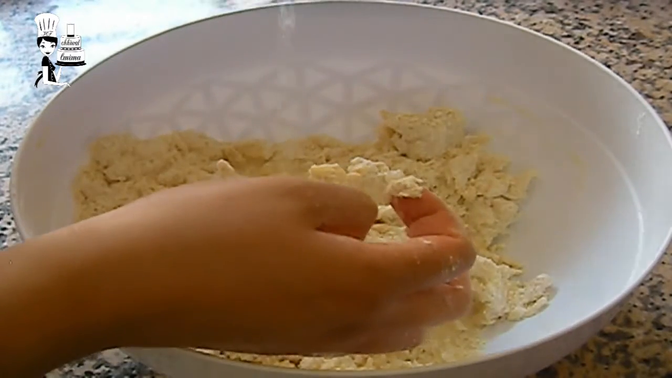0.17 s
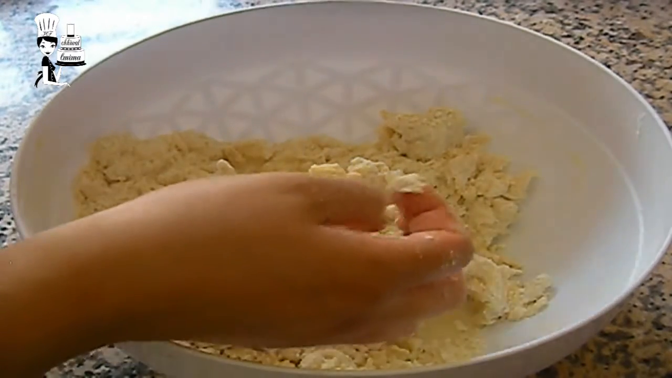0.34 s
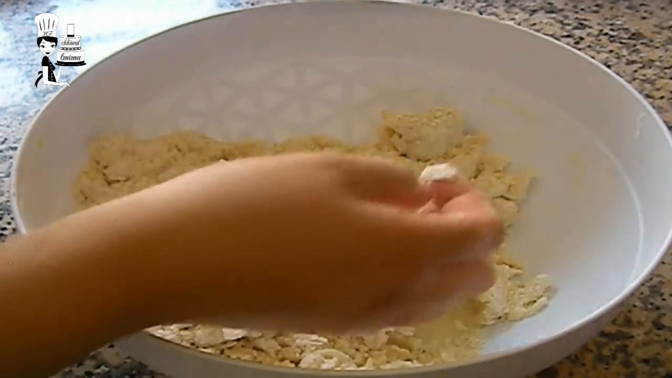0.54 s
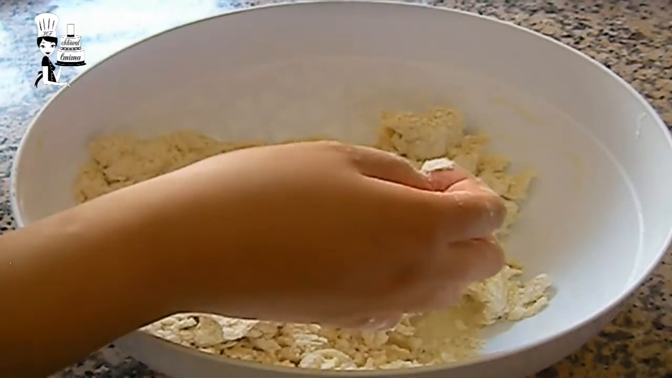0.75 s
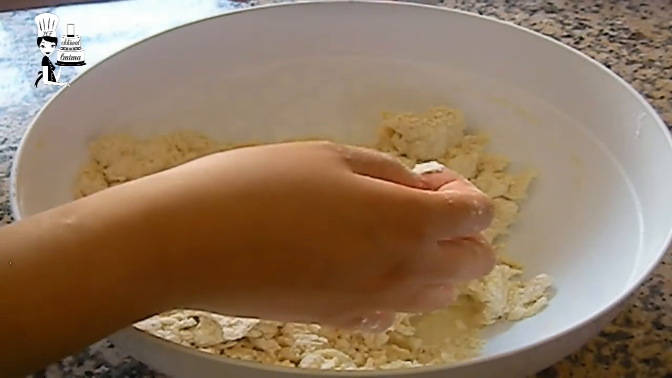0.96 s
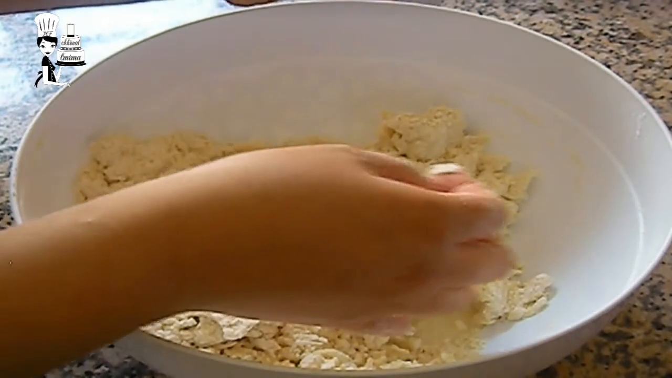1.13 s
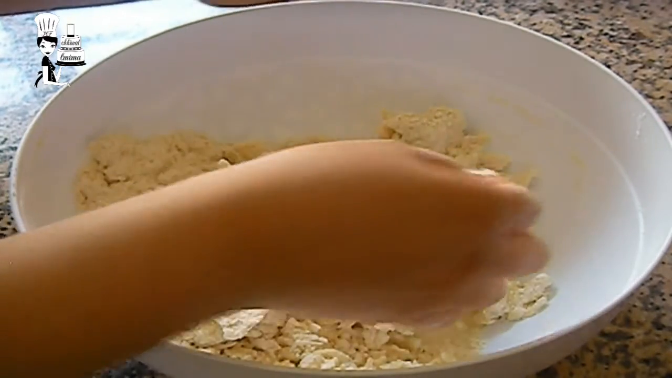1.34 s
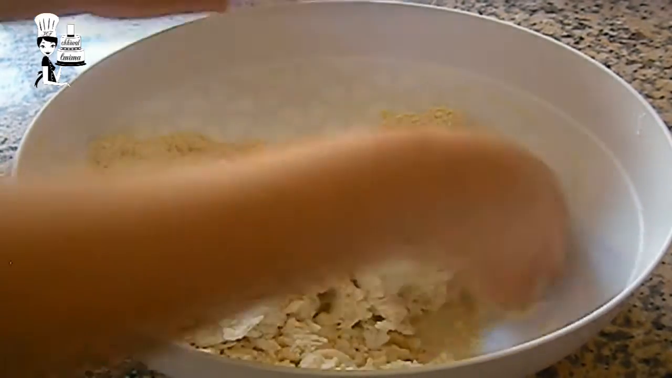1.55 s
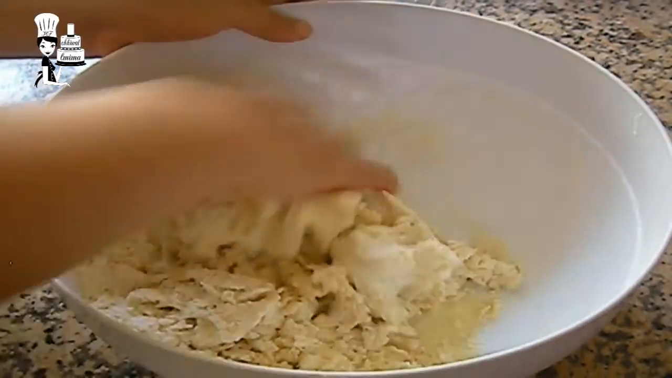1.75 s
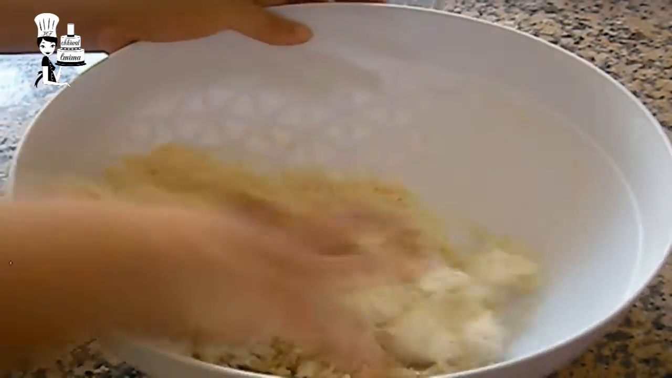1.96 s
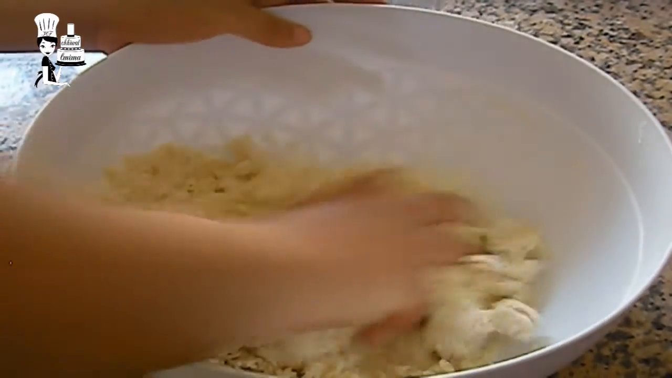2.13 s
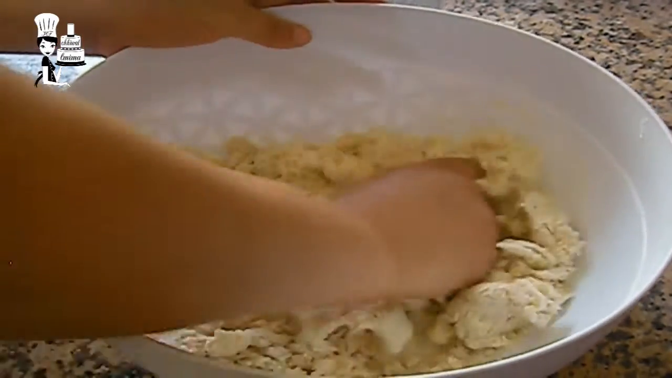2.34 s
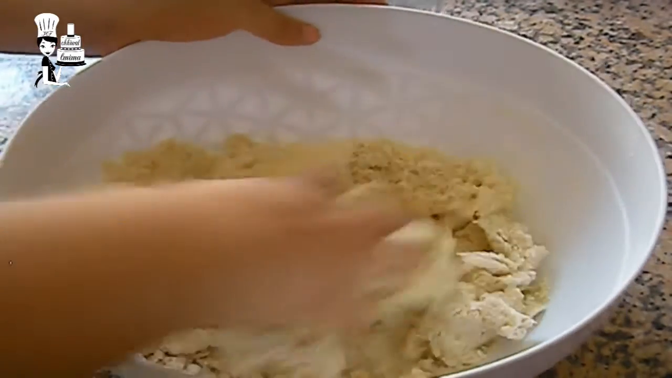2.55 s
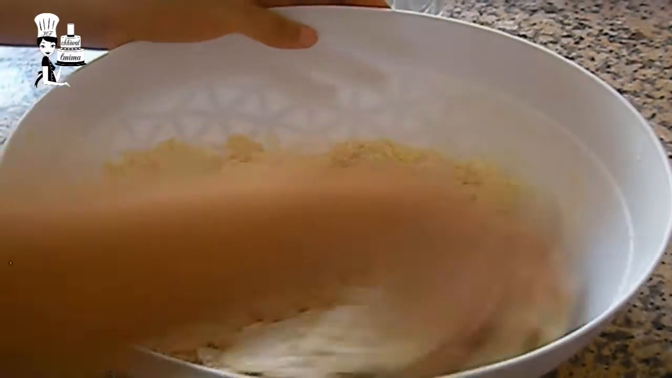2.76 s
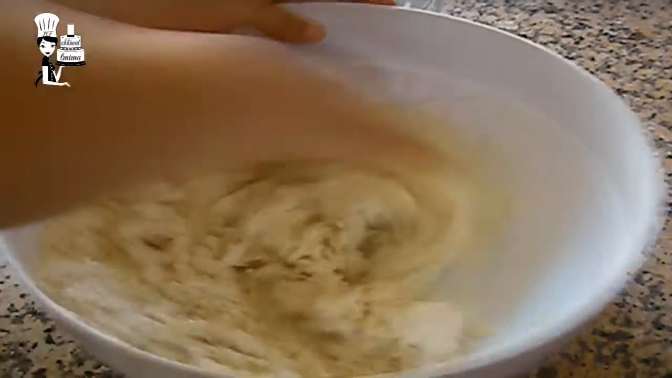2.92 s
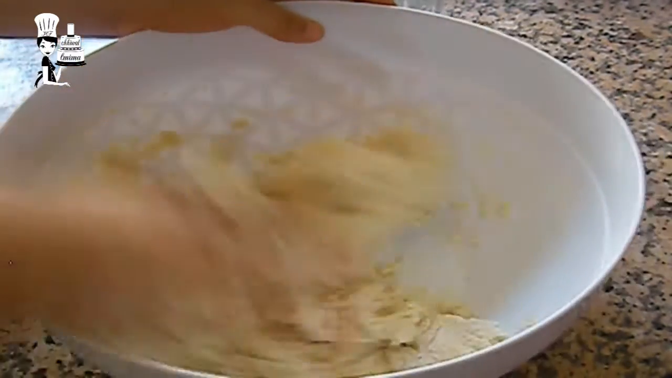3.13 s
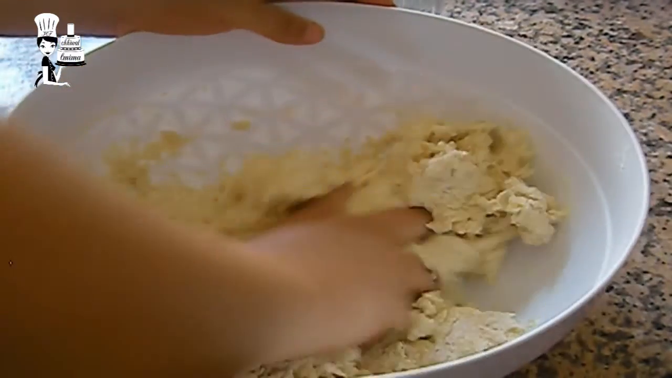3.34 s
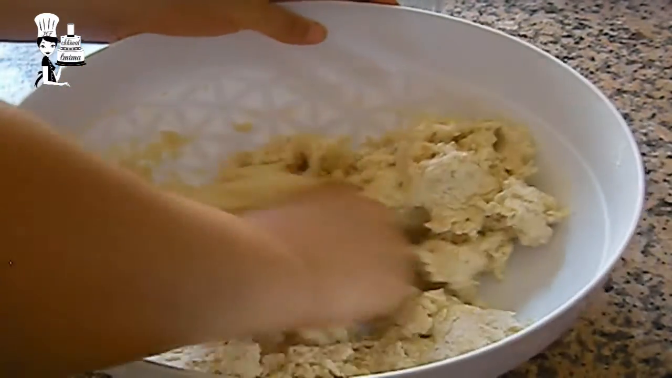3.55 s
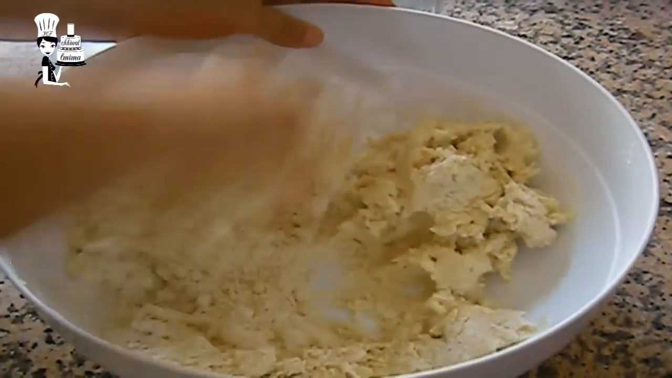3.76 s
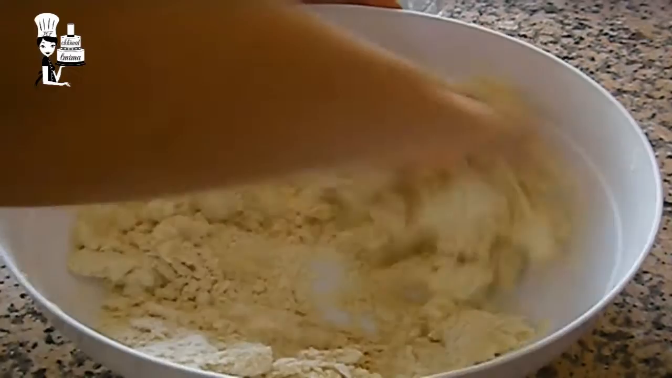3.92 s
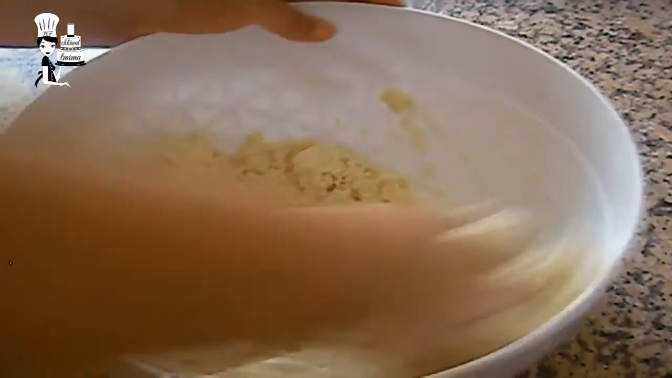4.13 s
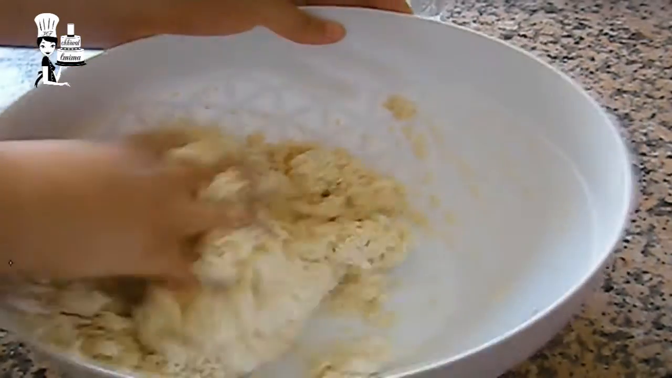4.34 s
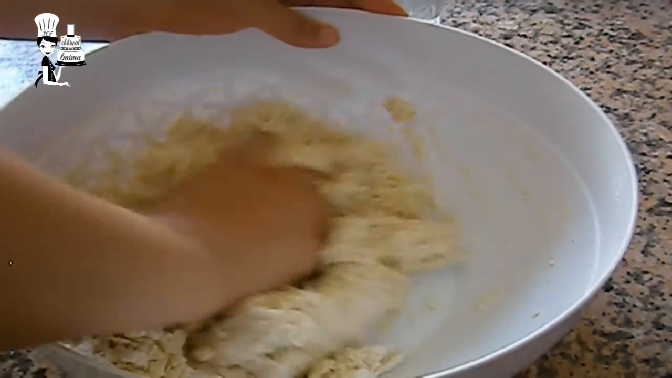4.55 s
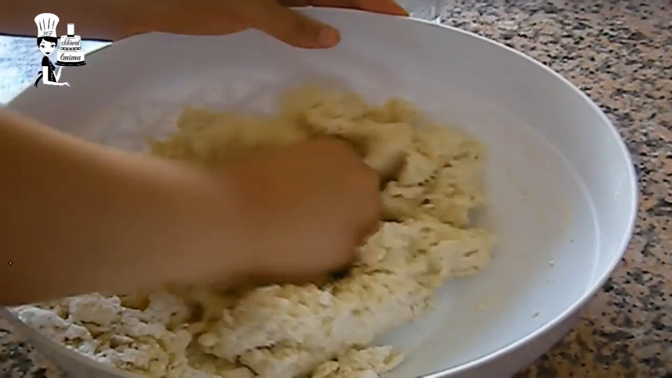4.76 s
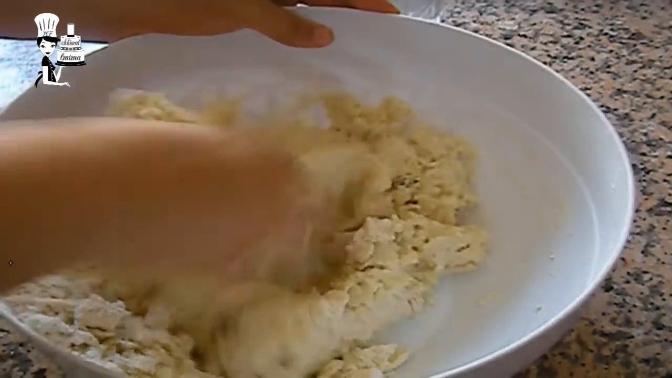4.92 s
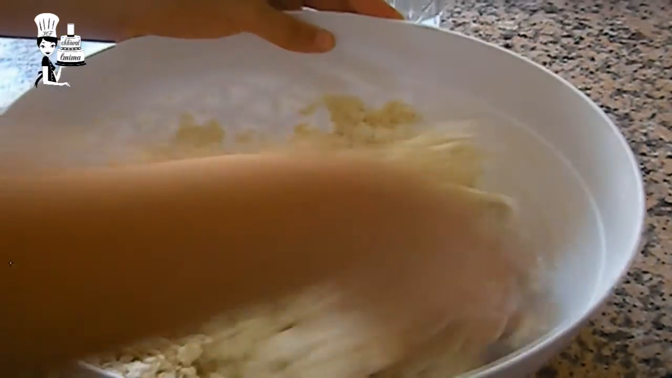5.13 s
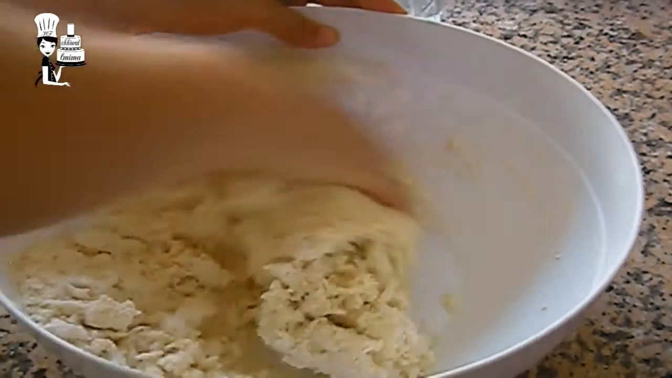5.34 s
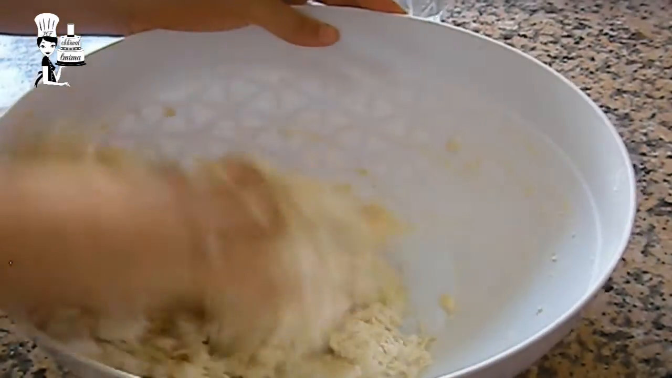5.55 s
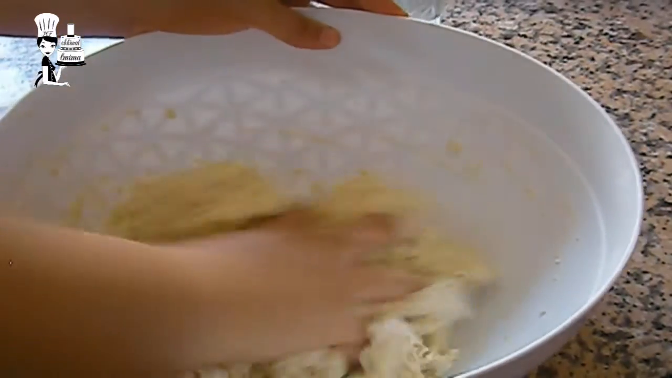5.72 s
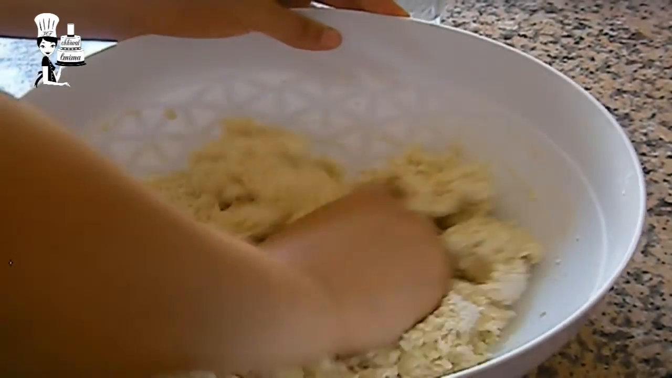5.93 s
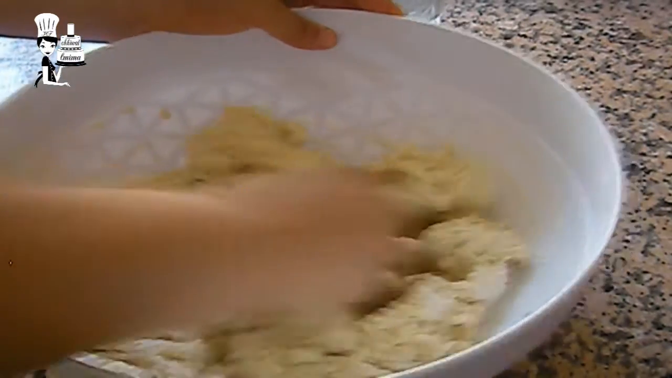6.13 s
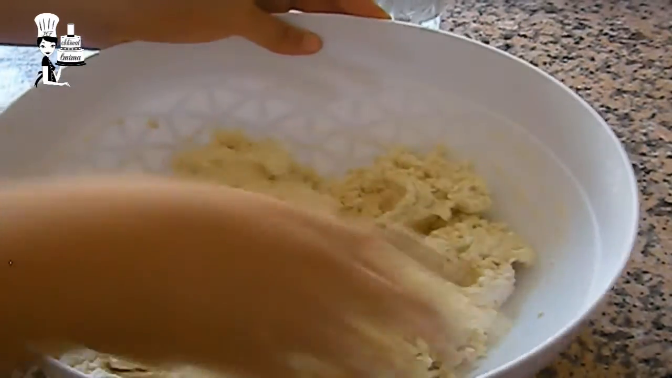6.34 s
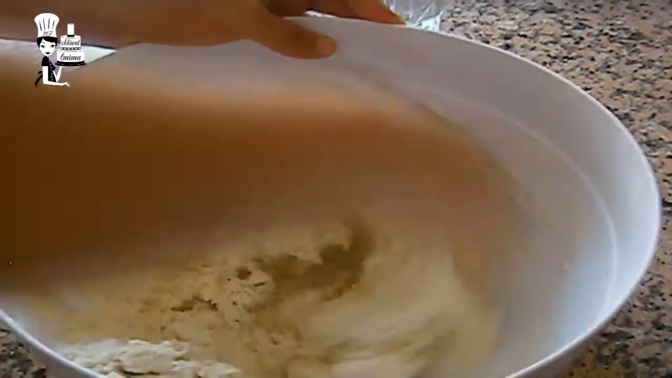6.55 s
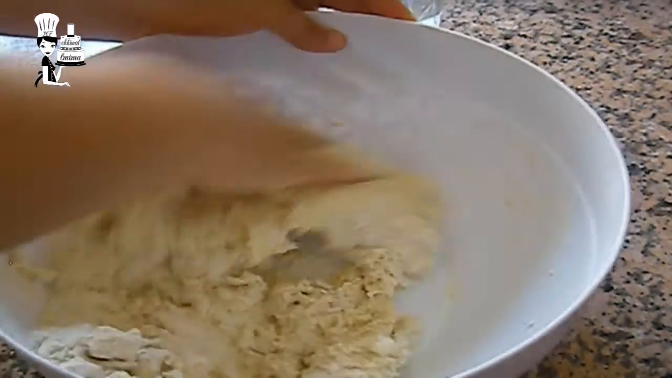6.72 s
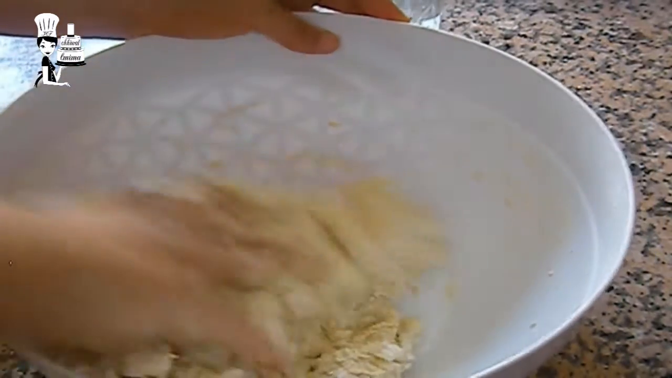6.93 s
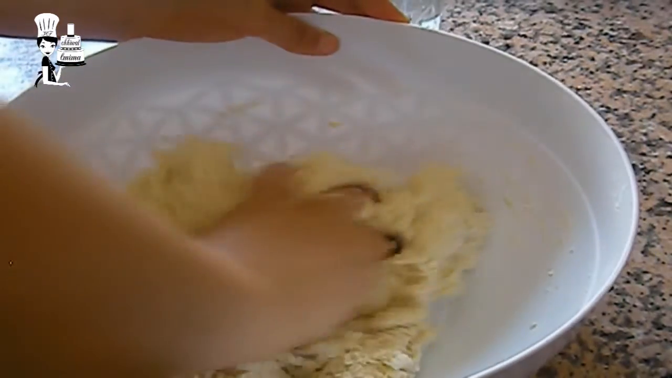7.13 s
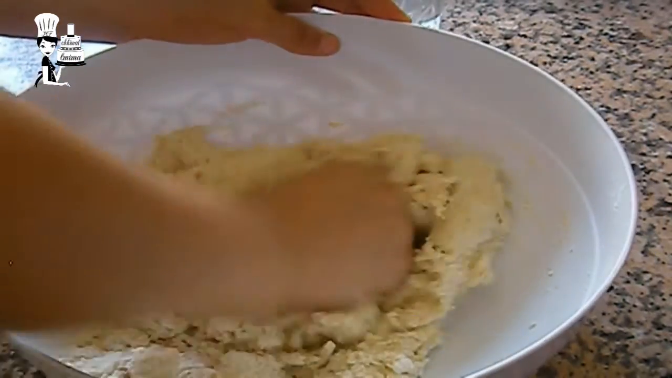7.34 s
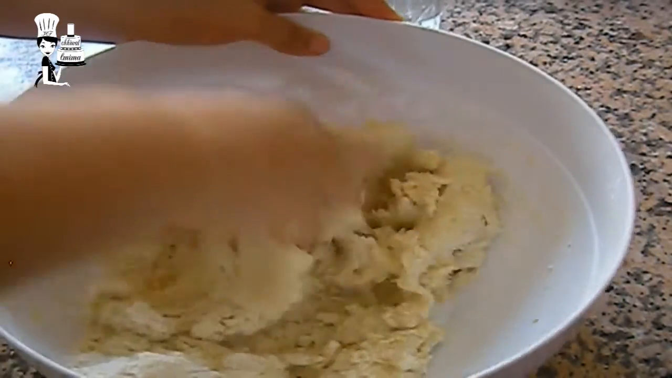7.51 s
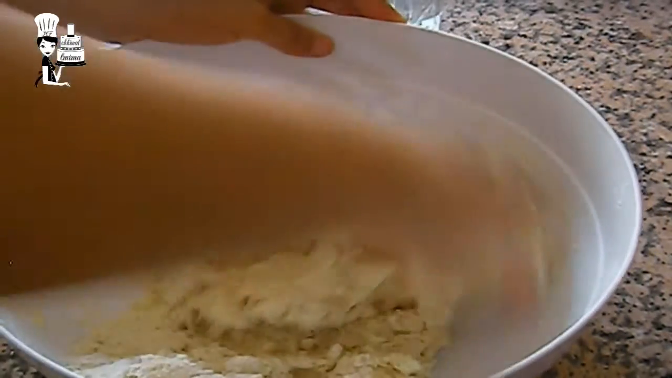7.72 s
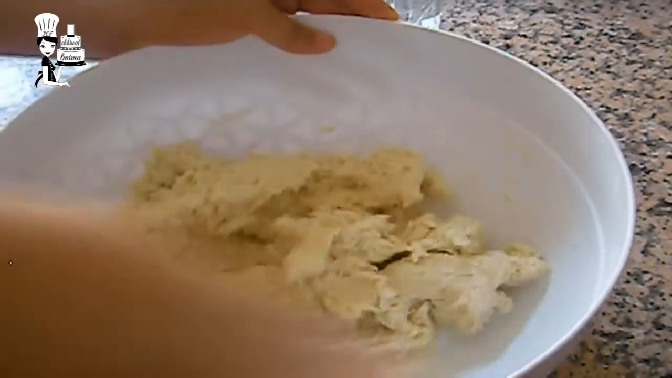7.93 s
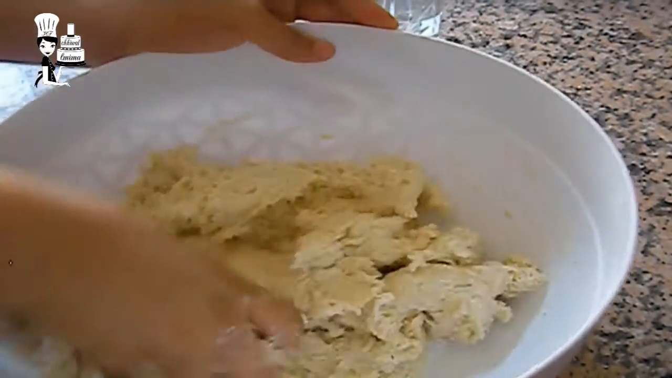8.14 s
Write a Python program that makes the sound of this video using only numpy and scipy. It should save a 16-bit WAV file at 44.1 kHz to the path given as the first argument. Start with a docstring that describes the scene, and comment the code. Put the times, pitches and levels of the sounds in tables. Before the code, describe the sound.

Soft scraping of dough being mixed by hand, a glass set down on stone, and a plastic bowl knocking over a low drone.

```python
"""In a small hard kitchen, over a low drone, a hand stirs crumbly dough in a plastic bowl: crumbs drag on
the wall, sticky dough snaps as it parts. At 1.3 and 1.6 s a glass is set down on the stone counter and
rings. Then the hand squeezes harder and the bowl rocks and knocks on the stone. Around 5 s its wall groans
under the hand; its hardest knock lands at 6.5 s, and the kneading goes on to the end.
A dull microphone hears it all and overloads on the loudest blows."""
import sys
import numpy as np
from scipy import signal
from scipy.fft import rfft, irfft
from scipy.io import wavfile
from scipy.ndimage import uniform_filter1d

SR = 44100
rng = np.random.default_rng(int(sys.argv[2]) if len(sys.argv) > 2 else 0)


def waveform_to_disk(signal):
    """Save audio, clipped to [-1, 1], as 16-bit WAV at the path in sys.argv[1]."""
    frames = np.transpose(np.atleast_2d(signal))
    scaled = np.clip(frames, -1, 1) * 32767
    samples = np.round(scaled).astype(np.int16)
    wavfile.write(sys.argv[1], SR, samples)


N = 360621

# sticky dough letting go: (time [s], peak [dB], cavity pitch [Hz], cavity gain [dB])
DOUGH_SNAPS = [(0.084, -28.5, 2390, 7), (0.306, -23.5, 4000, 23), (0.3168, -29, 2460, 23),
               (0.41, -19, 2200, 16.5), (0.445, -21.5, 2460, 4), (0.5372, -26.5, 2270, -1),
               (1.82, -18, 2790, 5), (1.8565, -21, 2830, 17), (2.4032, -15, 2110, 16),
               (3.1012, -18, 2300, 13), (3.5915, -21, 2640, 14), (3.7394, -14.5, 2350, 13.5),
               (3.944, -14, 2670, 2), (4.058, -20, 1860, 13), (4.122, -28, 2200, 19),
               (4.136, -17, 2200, 21.5), (4.159, -17.5, 2150, 29.5), (4.165, -34, 2400, 12),
               (4.684, -13, 2300, 5), (4.752, -20.5, 2450, 3), (4.765, -29, 3500, 2),
               (4.834, -20.5, 2550, -9), (5.206, -19, 2200, 16), (5.3252, -21.5, 3300, -2),
               (5.382, -24, 2040, 6), (5.472, -19.5, 2730, 11), (6.131, -15.5, 2150, -6),
               (6.18, -25, 3700, 17), (6.387, -14, 2360, 5), (6.48, -27, 2920, 13), (6.527, -36, 1800, 10),
               (6.651, -22, 2040, 18), (6.665, -17, 1814, 21), (6.6938, -15.5, 1880, 28),
               (6.8593, -28, 2510, 15), (7.438, -19, 2480, 11), (7.504, -28, 3180, 3),
               (7.6894, -16.5, 2300, -2), (7.7536, -15.5, 2900, 5), (7.9477, -28, 1940, 22),
               (7.9846, -18.5, 1700, 11), (8.0046, -20.5, 2290, 13.5)]
# the bowl rocks onto the stone: (time [s], ring peak [dB], crack above ring [dB], ring length [x t60])
BOWL_KNOCKS = [(1.871, -19, 6.5, 0.58), (2.312, -20.5, -1, 0.64), (2.979, -5.5, -2.5, 0.37),
               (2.995, -37, -11, 0.83), (3.024, -15.5, -1, 0.29), (3.121, -9.5, -3, 0.23),
               (3.54, -26, -2, 0.5), (3.591, -24.5, 12, 0.32), (3.739, -21, -10, 0.72),
               (4.102, -8.5, 0, 0.46), (4.124, -14, -8, 0.57), (4.135, -26, -5, 0.29),
               (4.159, -32, -12, 0.57), (4.223, -19, 3.5, 0.34), (4.327, -16, -8, 0.74),
               (4.752, -18.5, -16, 0.47), (5.205, -23.5, -2, 0.54), (5.425, -16, -2, 0.49),
               (5.496, -9.5, 2, 0.61), (5.866, -13, -2, 0.19), (6.097, -16.5, -8, 0.88),
               (6.4971, 3.5, -5.5, 0.57), (6.509, -10, -22, 0.95), (6.516, -9, -22, 0.55),
               (6.543, -16, -17, 1), (6.563, -12, -25, 1), (6.572, -13, -21, .8), (6.652, -15, -3.5, 0.59),
               (7.689, -19.5, -7, 0.31), (7.946, -21, 0, 0.48), (8.005, -24, -3, 0.87),
               (8.149, -17, -11, 0.68)]
# the glass meets the stone: (time [s], crack [dB], hardness [dB/octave], ring [dB], rattle t60 [s])
GLASS_HITS = [(1.332, 17, 2.5, -22, 0.027), (1.345, 3, 2, -34.5, .02), (1.565, -8, -4, -43, 0.02),
              (1.5686, 12, 0.5, -25, 0.014), (1.580, 2.5, 2, -49.5, 0.011), (1.591, 4.5, 1, -35, .012),
              (1.606, 1.5, -0.5, -32.5, 0.015)]


def gain_of(db):
    """Decibels to amplitude."""
    return 10 ** (np.asarray(db) / 20)


def unit_rms(x):
    """Scales to rms 1."""
    return x / np.sqrt(np.mean(x ** 2) + 1e-20)


def with_peak(x, db):
    """Scales to a peak level."""
    return gain_of(db) * x / abs(x).max()


def curve_at(points, hz):
    """Reads a curve over log frequency."""
    f, value = np.transpose(points)
    return np.interp(np.log(hz + 1), np.log(f + 1), value)


def add(mix, s, sound):
    """Mixes a sound in at s seconds."""
    part = mix[round(s * SR):][:len(sound)]
    part += sound[:len(part)]


def drift(samples):
    """Slow random motion of rms 1, smoothed over so many samples."""
    return unit_rms(uniform_filter1d(uniform_filter1d(rng.standard_normal(N), samples), samples))


def eq_impulse(points, tilt_db=0., size=4096):
    """Minimum-phase response of an EQ curve, tilted by tilt_db per octave about 1 kHz."""
    hz = abs(np.fft.fftfreq(size, 1 / SR))
    db = curve_at(points, hz) + tilt_db * np.log2(np.clip(hz, 100, 6000) / 1000)
    log_gain = np.log(gain_of(np.maximum(db, -120)))
    return np.fft.ifft(np.exp(log_gain - 1j * signal.hilbert(log_gain).imag)).real[:size // 2]


def moving_eq(x, db):
    """Shapes the short-time spectrum by db(Hz, s)."""
    hz, t, z = signal.stft(x, SR, nperseg=1024, noverlap=768)
    return signal.istft(z * gain_of(db(hz[:, None], t)), SR, nperseg=1024, noverlap=768)[1][:len(x)]


def resonate(x, hz, width, stages=2):
    """A resonance that can glide: each stage shifts hz down to zero, smooths, and shifts back."""
    carrier = np.exp(2j * np.pi * np.cumsum(hz * np.ones(len(x))) / SR)
    pole = np.exp(-np.pi * width / SR)
    for _ in range(stages):
        x = 2 * (carrier * signal.lfilter([1 - pole], [1, -pole], x / carrier + 1e-18)).real
    return x


def burst(t60, size=1500):
    """A click scattered by chained all-pass echoes: a rough dying burst with a flat spectrum."""
    x = signal.unit_impulse(size)
    for share in rng.uniform(.5, 1, 5) * np.geomspace(.12, .01, 5):
        delay = max(round(share * t60 * SR), 1)
        echo = np.append(signal.unit_impulse(delay), -.55)
        x = signal.lfilter(echo[::-1], echo, x)
    return x


def envelope(t, start, level_db, fade_db_per_s, swell=0., hold=0.):
    """Swell by 9.5 dB up to the level, hold, then fade, as power: one row for each event."""
    start, level_db, swell, hold = (np.reshape(v, (-1, 1)) for v in (start, level_db, swell, hold))
    since = t - start
    climb_db = 9.5 * np.minimum(since / np.maximum(swell, .002) - 1, 0)
    fall_db = fade_db_per_s * np.maximum(since - (swell + hold), 0)
    return gain_of(level_db + climb_db - fall_db) ** 2 * (since > -.02)


def kitchen(x):
    """Hard-room reverb: sparse reflections after the first wall, each band dying at its own speed."""
    # decay of the room: (frequency [Hz], t60 [s])
    decay = [(150, 0.98), (400, 0.33), (1000, 0.46), (2700, 0.38), (5000, 0.37), (10000, 0.41)]
    first_wall_s = .009
    taps = np.zeros(SR)
    at = np.arange(round(first_wall_s * SR), SR - 20, 20)
    taps[at + rng.integers(0, 20, len(at))] = rng.choice([-1., 1.], len(at))
    hz, t, z = signal.stft(taps, SR, nperseg=256)
    tail = signal.istft(z * gain_of(-60 * t / curve_at(decay, hz)[:, None]), SR, nperseg=256)[1]
    return signal.fftconvolve(x, tail / np.linalg.norm(tail))[:N]


def room_tone():
    """Low drone of the house over the hiss of the microphone, swelling a little."""
    # colour of drone and hiss: (frequency [Hz], level [dB])
    spectrum = [(40, -10.5), (80, -5), (105, -22.5), (145, -1), (200, -5), (245, -18.5), (280, -8),
                (440, -14), (700, -18.5), (2000, -26), (3500, -30.5), (4300, -26), (7000, -56)]
    level_db = -39.5 + 0.89 * drift(4000)
    colour = gain_of(curve_at(spectrum, np.fft.rfftfreq(N, 1 / SR)))
    air = irfft(rfft(rng.standard_normal(N)) * colour, N)
    return gain_of(level_db) * unit_rms(air)


def sub_flutter():
    """A soft, nearly pitched flutter at the bottom of hearing."""
    # slow sway of the deepest bass: (time [s], level [dB])
    sway = [(0.0, -44), (1.23, -52), (1.34, -39), (1.39, -41.5), (1.931, -40), (2.05, -50), (2.96, -52),
            (3.23, -41), (4.09, -55), (4.12, -43), (4.37, -46), (4.57, -35), (4.78, -44.5), (6.8, -46),
            (7.1, -40.5), (8.17, -32.5)]
    s, level_db = np.transpose(sway)
    flutter = resonate(rng.standard_normal(N), hz=35, width=16, stages=3)
    return unit_rms(flutter) * gain_of(np.interp(np.arange(N) / SR, s, level_db))


def hum():
    """A soft low note that comes and goes, drifting in pitch and wavering a little."""
    # path of the note: (time [s], pitch [Hz], level [dB])
    path = [(0.0, 100, -41), (0.16, 104, -39), (0.25, 81.3, -51), (0.45, 76.6, -46), (1.21, 76.9, -44),
            (1.36, 71.2, -41), (1.45, 83.8, -46.5), (2.14, 85.1, -34.5), (2.32, 94.4, -43.5),
            (3.57, 101, -53.5), (3.69, 75.9, -52), (3.93, 71.2, -53), (4.28, 104, -43), (4.89, 104, -44),
            (5.28, 82.7, -49.5), (5.53, 92.4, -39), (6.24, 86.0, -48), (6.58, 104, -41), (6.67, 93.4, -51),
            (7.05, 104, -44.5), (7.33, 71.8, -45), (7.71, 71.2, -49), (7.76, 86.2, -43), (8.17, 101, -48)]
    s, hz, level_db = np.transpose(path)
    t = np.arange(N) / SR
    waver_hz = 2.06 * drift(3000)
    cycles = np.cumsum(np.interp(t, s, hz) + waver_hz) / SR
    return np.sqrt(2) * np.sin(2 * np.pi * cycles) * gain_of(np.interp(t, s, level_db))


def counter_rumble():
    """The loaded bowl rubs on the counter and blows shake it; it answers with its low resonances."""
    # how hard the bowl is pushed against the stone: (time [s], level [dB])
    pressure = [(0.0, -33), (0.04, -37.5), (0.82, -43), (1.5, -34.5), (2.109, -43), (2.66, -38),
                (2.98, -42), (3.89, -34.5), (4.3, -35.5), (4.42, -27.5), (4.82, -32), (4.96, -40.5),
                (5.46, -38), (5.51, -31), (5.64, -36), (6.14, -39.5), (6.46, -38), (6.51, -37), (6.76, -41),
                (7.24, -37), (7.46, -35), (7.94, -40), (8.17, -37)]
    # resonances of the counter: (frequency [Hz], width [Hz], level [dB])
    counter_modes = [(119.3, 11, -4), (144.5, 17, -1.5), (207.9, 16, -3.5)]
    t, rub = np.arange(N) / SR, rng.standard_normal(N)
    body = sum(gain_of(db) * unit_rms(resonate(rub, hz, width)) for hz, width, db in counter_modes)
    low_band = signal.butter(3, [90, 230], "band", fs=SR, output="sos")
    rumble = unit_rms(signal.sosfilt(low_band, rng.standard_normal(N)))
    blows = [(s, db - 26.5) for s, db, *_ in BOWL_KNOCKS] + [(s, db - 48.5) for s, db, *_ in GLASS_HITS]
    shake_power = envelope(t[::100], *np.transpose(blows), fade_db_per_s=93).sum(0)
    push_power = gain_of(np.interp(t, *np.transpose(pressure))) ** 2
    return unit_rms(body + 0.89 * rumble) * np.sqrt(push_power + np.interp(t, t[::100], shake_power))


def bowl_groans():
    """The wall groans as the hand leans on it: a fuzzy, gliding low note with a weaker octave."""
    # groans: (start [s], swell [s], hold [s], level [dB], first pitch [Hz], last pitch [Hz])
    groans = [(4.901, 0.12, 0.035, -35.5, 270, 279), (5.071, 0.038, 0.11, -38.5, 292, 301),
              (5.098, 0.017, 0.039, -34, 345, 330), (5.386, 0.013, 0.028, -30, 344, 333)]
    width_hz, octave_db = 41, -9
    out, t = np.zeros(N), np.arange(SR // 2) / SR
    for s, swell, hold, db, first_hz, last_hz in groans:
        hz = np.interp(t, [0, swell + hold], [first_hz, last_hz])
        note = unit_rms(resonate(rng.standard_normal(len(t)), hz, width_hz))
        octave = unit_rms(resonate(rng.standard_normal(len(t)), 2 * hz, 2 * width_hz))
        power = envelope(t, 0, db, fade_db_per_s=295, swell=swell, hold=hold)[0]
        add(out, s, np.sqrt(power) * (note + gain_of(octave_db) * octave))
    return out


def glass_on_stone():
    """Two layers: the broad crack of glass on stone, and hollow low tones under its thin high ring."""
    # colour of the impact: (frequency [Hz], level [dB])
    impact_eq = [(100, -36), (250, -17), (385, -6), (500, 8), (700, -2), (1000, 2), (1300, -6.5),
                 (1750, -7.5), (2300, -14.5), (2900, -18.5), (3500, -23.5), (4400, -30.5), (5500, -25),
                 (7000, -25)]
    # hollow low tones that sound with the blow, and the glass's thin high ring:
    # (frequency [Hz], level [dB], t60 [s])
    ring_tones = [(458, -1, 0.35), (488, 0, 0.2), (339, -4, 0.5), (544, 7, 0.12), (600, 3, 0.25),
                  (845, 0, 0.3), (899, -2, 0.6), (1023, -2, 0.4), (1077, -2, 0.4), (1187, -5, 0.5),
                  (1593, -2, 0.27), (1744, -2, 0.3), (1857, -6, 0.3), (2632, -10, 0.19), (1954, -8, 0.3),
                  (2191, -8, 0.35), (2401, -10, 0.3), (3100, 1, 0.45), (3108, -9, 0.45), (4899, -2, 0.42),
                  (4907, -12, 0.42)]
    hz, tone_db, t60 = np.transpose(ring_tones)[:, :, None]
    cracks, rings = np.zeros((2, N))
    t = np.arange(SR // 2) / SR
    for s, db, hardness_db, ring_db, rattle_t60 in GLASS_HITS:
        colour = eq_impulse(impact_eq, hardness_db)
        rattle = burst(rattle_t60, size=5000)
        add(cracks, s, gain_of(db) * signal.fftconvolve(rattle, colour / abs(colour).max()))
        tones = gain_of(ring_db + tone_db - 60 * t / t60) * np.sin(2 * np.pi * hz * t)
        add(rings, s, tones.sum(0))
    return cracks, rings


def bowl_knocks():
    """A dry crack at the contact with the stone, then the damped low modes of the loaded bowl."""
    # colour of the contact: (frequency [Hz], level [dB])
    contact_eq = [(300, -21.5), (800, -4.5), (1400, 6.5), (2000, 3.5), (3000, -4.5), (4800, -10.5),
                  (7000, -10.5)]
    # modes of the bowl: (frequency [Hz], level [dB], t60 [s])
    bowl_modes = [(140, -27, 0.026), (198, -14, 0.095), (353, -16.5, 0.14), (470, 6, 0.018),
                  (575, 3, 0.013), (628, 9, 0.0056), (817, -14.5, 0.033)]
    hz, mode_db, t60 = np.transpose(bowl_modes)[:, :, None]
    out, t, colour = np.zeros(N), np.arange(4000) / SR, eq_impulse(contact_eq)
    attack = 1 - np.exp(-(t / 0.0013) ** 2)
    for s, db, crack_db, ring_length in BOWL_KNOCKS:
        spot_db = .8 * rng.standard_normal(hz.shape)  # each contact spot favours other modes
        decay_db = 60 * t / (t60 * max(ring_length, .2))
        partials = gain_of(mode_db + spot_db - decay_db) * np.sin(2 * np.pi * hz * t)
        crack = signal.fftconvolve(burst(t60=0.008), colour)
        add(out, s + 0.001016, with_peak(crack, db + crack_db))
        add(out, s + 0.00199, -with_peak(attack * partials.sum(0), db))
    return out


def dough_snaps():
    """Each parting of dough is a tiny dry crack, coloured by the cavity it leaves."""
    # colour of a snap: (frequency [Hz], level [dB])
    snap_eq = [(600, -26), (1500, -11), (2500, -9), (3500, -4.5), (4500, -6), (7000, -25.5)]
    out, colour = np.zeros(N), eq_impulse(snap_eq)
    for s, db, cavity_hz, cavity_db in DOUGH_SNAPS:
        crack = burst(t60=.005)
        cavity = gain_of(cavity_db) * resonate(crack, cavity_hz, width=540)
        add(out, s, with_peak(signal.fftconvolve(crack + cavity, colour), db))
    return out


def hand_motion(t):
    """Level, brightness and cupping of the scrape: strokes and trickling crumbs add in power."""
    # strokes through the dough:
    # (start [s], swell [s], hold [s], level [dB], brightness [dB/octave], cupping of the palm [dB])
    strokes = [(0.136, 0.058, 0.19, -48.5, 3.5, -5), (1.745, 0.15, 0.029, -29, 1, -0.5),
               (2.006, 0.054, 0.44, -38.5, 3, -0.5), (2.297, 0.026, 0.1, -31, 0.5, 7.5),
               (2.383, 0.024, 0.035, -30.5, 3.5, -8), (2.645, 0.03, .03, -35.5, -1, -4),
               (2.977, 0.0076, 0.24, -33, 1.5, 2.5), (3.298, 0.17, 0.088, -29.5, 1.5, -0.5),
               (3.724, .02, 0.1, -38.5, 1.5, -2), (4.094, 0.042, 0.18, -32, 1.5, 6.5),
               (4.36, 0.033, 0.06, -37.5, 0.5, -3), (4.428, 0.04, 0.055, -34, 1.5, 3),
               (4.553, 0.034, 0.086, -37, 0, 0), (4.772, 0.28, 0.22, -38.5, -0.5, -1.5),
               (5.345, 0.088, 0.15, -31.5, 2.5, 2.5), (5.667, .17, 0.064, -33, -1.5, -1),
               (5.91, 0.067, 0.1, -31.5, 2, 2), (6.185, 0.093, 0.076, -36.5, 1.5, -3),
               (6.635, 0.046, 0.039, -33.5, 2, 4), (6.74, 0.095, 0.12, -34.5, 3, 4),
               (7.01, 0.039, 0.31, -37, 2, -0.5), (7.447, 0.16, 0.094, -36.5, 1, -2.5),
               (7.903, 0.065, 0.33, -37, -0.5, 2)]
    still_db, knead_from_s, restless_db = -54.5, 1.7, -42.5  # fingers almost still, then restless dough
    start, swell, hold, level_db, tilt_db, cupping_db = np.transpose(strokes)
    power = [envelope(t, start, level_db, fade_db_per_s=93, swell=swell, hold=hold)]
    # crumbs trickle after each event: (events, relative level [dB], fade [dB/s], brightness [dB/octave])
    trickles = (DOUGH_SNAPS, -16.5, 520, 0), (BOWL_KNOCKS, -19.5, 670, -4)
    for events, relative_db, fade, trickle_tilt_db in trickles:
        s, event_db = np.transpose(events)[:2]
        power.append(envelope(t, s, event_db + relative_db, fade))
        tilt_db = np.append(tilt_db, np.full(len(s), trickle_tilt_db))
        cupping_db = np.append(cupping_db, np.zeros(len(s)))
    power = np.concatenate(power)
    total = power.sum(0) + gain_of(np.where(t < knead_from_s, still_db, restless_db)) ** 2
    return 10 * np.log10(total), tilt_db @ power / total, cupping_db @ power / total


def crumb_scrape():
    """Thousands of crumbs drag on the wall in clumps, a few crackle; a cupped palm favours one band."""
    # colour of crumbs on plastic: (frequency [Hz], level [dB])
    scrape_eq = [(150, -40), (250, -1.5), (340, 0.5), (400, -4.5), (500, 1), (720, -4.5), (880, -3),
                 (1200, -7.5), (2000, -7.5), (3000, -11.5), (4000, -15), (5500, -20), (7000, -26.5)]
    # the hollow of the palm opens and closes: (time [s], resonance [Hz])
    palm_sweep = [(1.75, 1800), (1.95, 2220), (2.0, 2020), (3.68, 1900), (3.73, 2380), (4.06, 1810),
                  (4.15, 2070), (4.56, 1820), (4.84, 2370), (5.13, 1740), (5.18, 2200), (5.83, 1780),
                  (6.42, 2180), (6.52, 1810), (7.67, 2140), (7.77, 2760), (7.83, 1870), (8.17, 1810)]
    crumbs_per_s, grit_per_s, palm_octaves = 5000, 200, 0.33
    soft = gain_of(2.75 * np.minimum(rng.exponential(1, N), 5)) * (rng.random(N) < crumbs_per_s / SR)
    grit = gain_of(4 + 3 * np.minimum(rng.exponential(1, N), 3)) * (rng.random(N) < grit_per_s / SR)
    crumbs = (soft + grit) * rng.choice([-1., 1.], N)
    clumps = crumbs * gain_of(1.4 * drift(400))
    flicker = rng.standard_normal((N // 256 + 9, 513)).T  # bands by frames: the colour flickers
    flicker = unit_rms(uniform_filter1d(uniform_filter1d(flicker, 10, axis=0), 12, axis=1))
    drag = unit_rms(moving_eq(clumps, lambda hz, t: curve_at(scrape_eq, hz) + 1.85 * flicker[:, :len(t)]))

    def hand_eq(hz, t):
        """The stroke tilts the spectrum and the palm lifts or dips one band."""
        _, tilt_db, cupping_db = hand_motion(t)
        slope_db = np.clip(tilt_db, -5, 5) * np.log2(np.clip(hz, 250, 6000) / 1500)
        octaves_off = np.log2((hz + 1) / np.interp(t, *np.transpose(palm_sweep)))
        return slope_db + cupping_db * np.exp(-(octaves_off / palm_octaves) ** 2)

    t = np.arange(N) / SR
    level_db = np.interp(t, t[::64], hand_motion(t[::64])[0])
    return moving_eq(drag, hand_eq) * gain_of(level_db)


def scene():
    """Close sources, each with its own reverb send, over a dry low bed; mono."""
    glass_crack, ringing = glass_on_stone()
    # (sound, reverb send [dB])
    close = [(glass_crack, 3), (ringing, -3), (bowl_knocks(), -3.5), (dough_snaps(), -4),
             (crumb_scrape(), -6), (bowl_groans(), -6)]
    reverb = kitchen(sum(x * gain_of(send_db) for x, send_db in close))
    bed = counter_rumble() + hum() + sub_flutter() + room_tone()
    return (sum(x for x, _ in close) + reverb + bed)[None]


def record(dry):
    """The microphone loses the treble, the converter clips the loudest blows, then a steep low-pass."""
    # response of the dull microphone: (frequency [Hz], gain [dB])
    microphone_eq = [(20, -2), (3000, 0.5), (3500, -3.5), (3880, -5), (4050, -16), (4220, -5.5),
                     (4600, -12), (5500, -15), (6400, -27), (7400, -42.5), (8300, -58.5), (10000, -47),
                     (12500, -62), (14000, -90.5)]
    dc_offset, cutoff_hz = -.0054, 15500
    dull = signal.oaconvolve(dry, eq_impulse(microphone_eq)[None])[:, :N]
    clipped = np.clip(dull + dc_offset, -1, 1)
    low_pass = signal.firwin(511, cutoff_hz, window=("kaiser", 9), fs=SR)
    return signal.oaconvolve(clipped, low_pass[None], "same")


dry = scene()
out = record(dry)
waveform_to_disk(out)
```